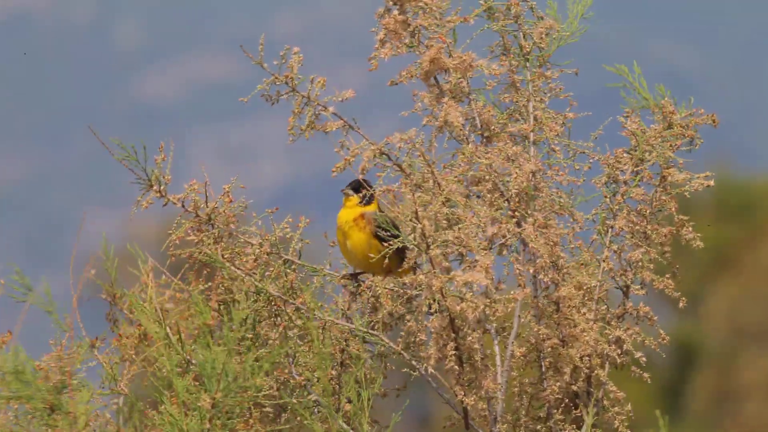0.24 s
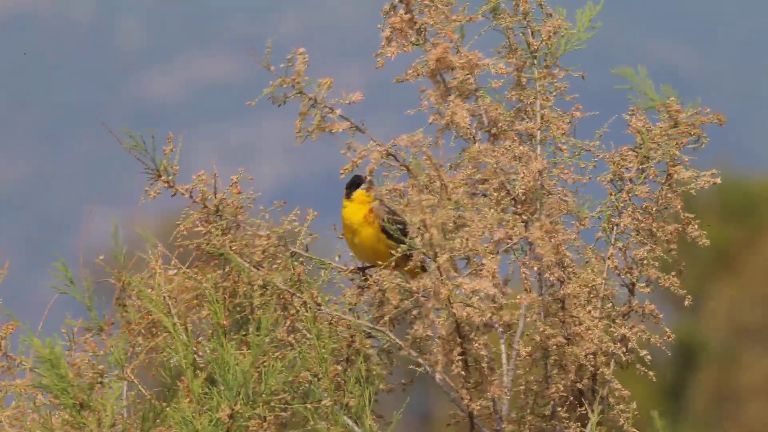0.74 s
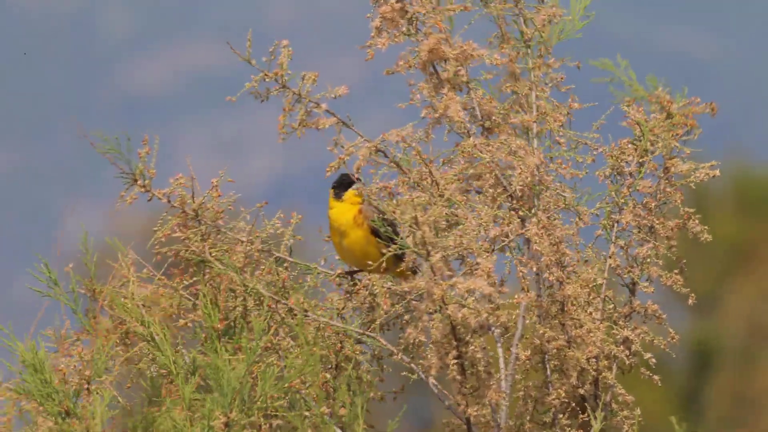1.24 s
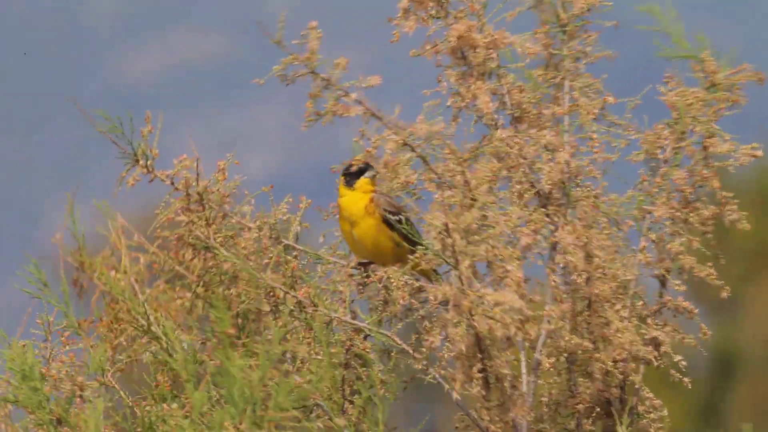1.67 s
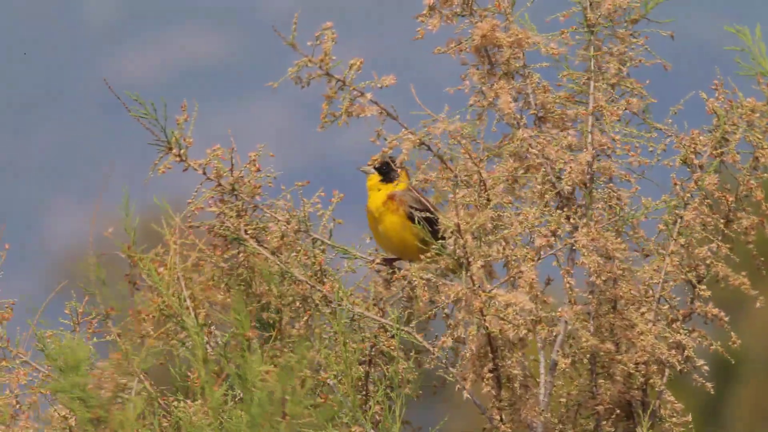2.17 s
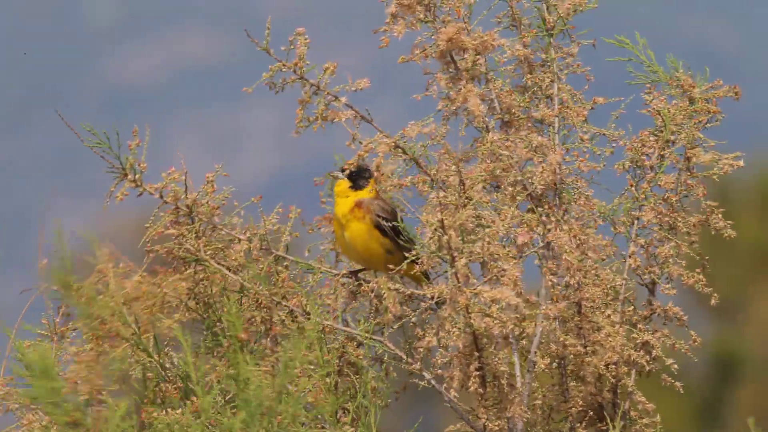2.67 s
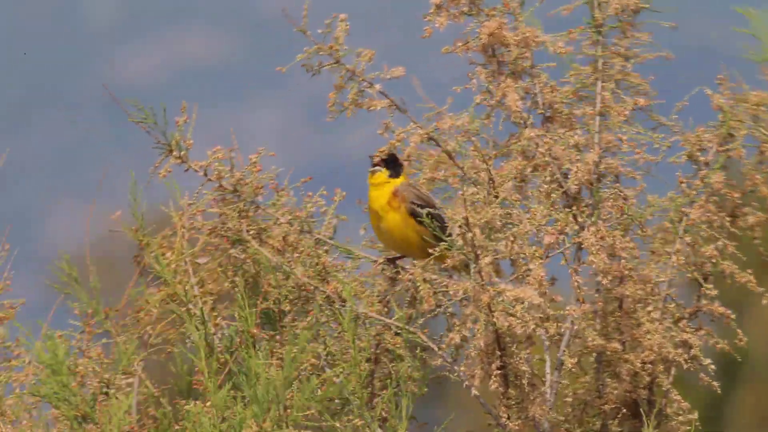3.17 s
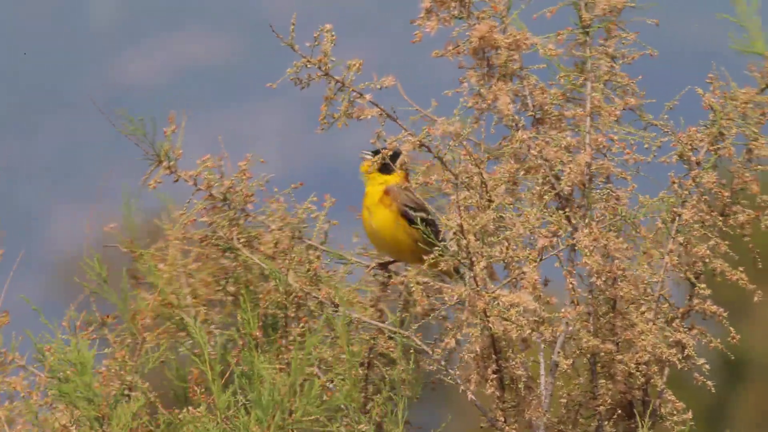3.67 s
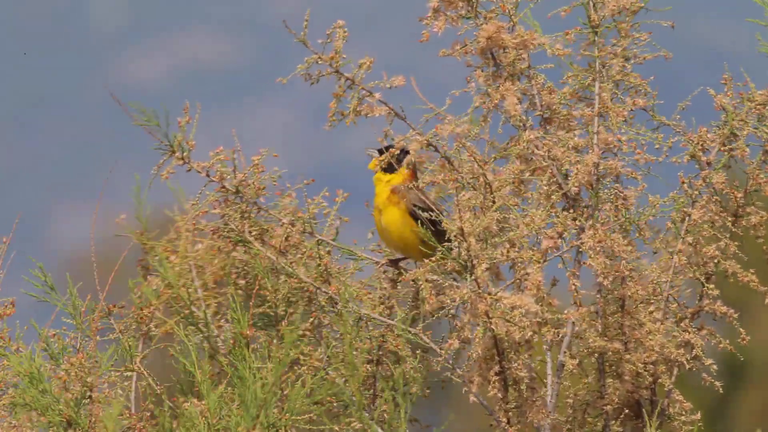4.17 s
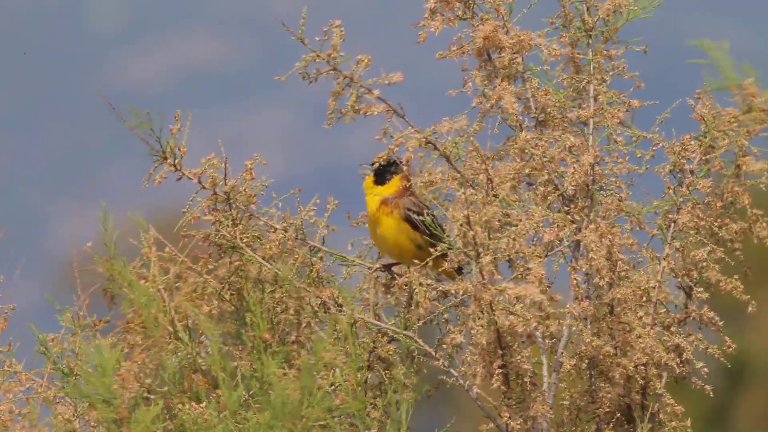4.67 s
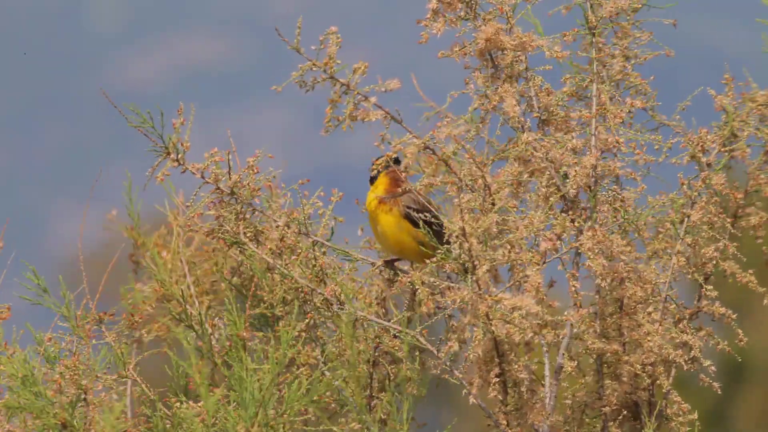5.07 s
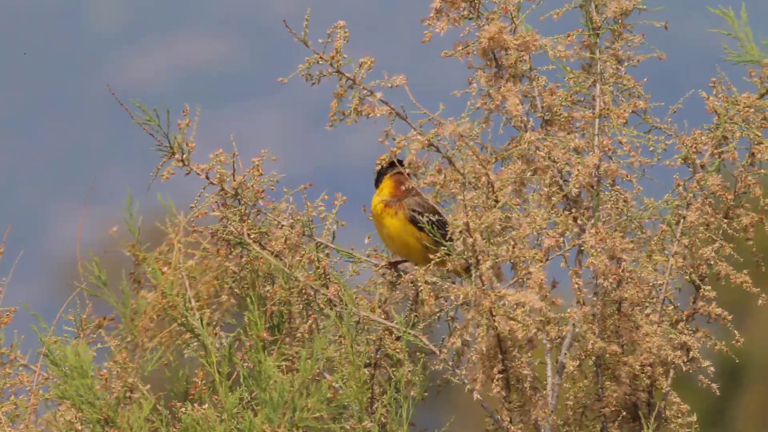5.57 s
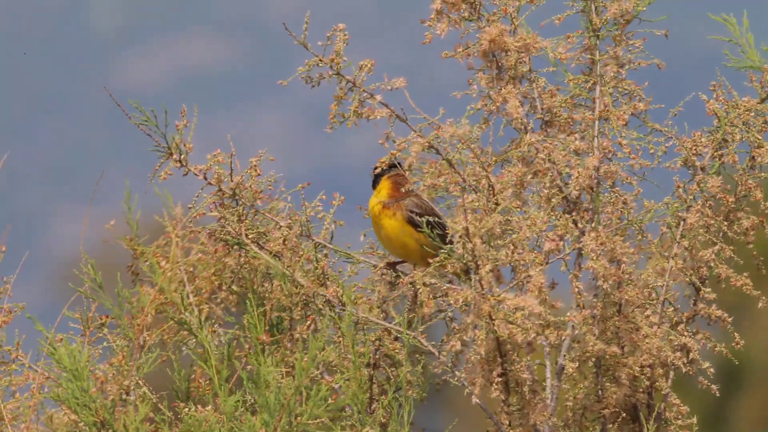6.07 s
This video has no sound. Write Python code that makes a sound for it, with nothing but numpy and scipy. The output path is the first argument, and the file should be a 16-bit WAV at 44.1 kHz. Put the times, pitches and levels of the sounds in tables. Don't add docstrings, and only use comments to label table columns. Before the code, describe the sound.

Outdoors, three brief quavering chirps from a close songbird lead to a rapid, high, varied song, with twig ticks and faint distant birds.

```python
import sys
import numpy as np
from scipy import signal
from scipy.fft import rfft, irfft
from scipy.io import wavfile
from scipy.ndimage import uniform_filter1d

SR = 44100
rng = np.random.default_rng(int(sys.argv[2]) if len(sys.argv) > 2 else 0)


def materialize(psi):
    bounded = np.clip(np.atleast_2d(psi).T, -1, 1)
    quanta = np.round(bounded * 32767).astype(np.int16)
    wavfile.write(sys.argv[1], SR, quanta)


def elevation(decibels):
    levels = np.asarray(decibels, float)
    return 10 ** (levels / 20)


N = 279153


def add(track, s, x):
    i = int(s * SR)
    track[i:i + len(x)] += x[:N - i]


def noise():
    return rng.standard_normal(N)


def band(x, hz, width):
    return signal.lfilter(*signal.iirpeak(hz, hz / width, fs=SR), x)


def steep(x, hz, width):
    return band(band(x, hz, width), hz, width)


def unit(x):
    return x / np.sqrt(np.mean(x ** 2))


def walk(rate):
    k = int(SR / rate)
    steps = np.repeat(rng.standard_normal(N // k + 1), k)
    return unit(uniform_filter1d(uniform_filter1d(steps, k), k)[:N])


def curve(table, ms=False):
    s, *columns = np.transpose(table)
    t = np.arange(0, s[-1], 1000 / SR) if ms else np.arange(N) / SR
    return [np.interp(t, s, c) for c in columns]


def decay(t, t60):
    return np.exp(-np.log(1000) * t / t60)


def swells(table, lull_db):
    t = np.arange(N) / SR
    return elevation(lull_db) + sum(elevation(db) * np.exp(-2 * ((t - s) / length) ** 2) for s, length, db in table)


def scattered(x, db, hz, width, decay_s):
    t = np.arange(SR // 15) / SR
    tail = rng.standard_normal(len(t)) * np.exp(-t / decay_s)
    tail /= np.sqrt(np.sum(tail ** 2))
    return elevation(db) * signal.fftconvolve(steep(x * walk(500), hz, width), tail)[:N]


def songbird():
    pure, quick, breathy, rattle, clicks = np.zeros((5, N))
    warbled_calls(breathy, quick)
    sung_strokes(pure, quick, breathy, rattle, clicks)
    for table in WHISTLES:
        add(pure, table[0][0], whistle(table))
    return echoed(turbulent(pure, quick, breathy, rattle, clicks))


# time in ms, centre pitch in Hz, pitch swing in
# Hz, throb as a share -1 to 1 (above 0 softens the crests), level in dB.
WARBLE = [
    (14, 3900, 540, 0, -22),
    (19, 4100, 800, -.2, -6.5),
    (30, 4180, 680, -.2, -6),
    (45, 4170, 580, .15, -3.5),
    (60, 4200, 320, .45, -2),
    (71, 4220, 190, .52, -3.5),
    (77, 4210, 70, .15, -2.5),
    (83.3, 4210, 5, 0, -5),
    (90, 4210, 5, 0, -24),
]
# start in seconds, level in dB, time stretch as a ratio,
# fade over the call in dB, longer tail in ms.
CALLS_AT = [
    (0.5594, -21, 1.001, -1.5, -1.5),
    (1.929, -19.5, 1.01, -11, 18),
    (2.5135, -17, .97, -3, -3.5),
]
# rate in Hz, time of a crest in ms, share of the throb as a ratio.
VIBRATOS = [
    (198, 28.2, 1.01),
    (198, 29.5, .45),
    (206, 29.3, .8),
]


def warbled_calls(breathy, quick):
    for (s, db, stretch, fade_db, tail_ms), (vibrato_hz, crest_ms, share) in zip(CALLS_AT, VIBRATOS):
        last_ms, *last = WARBLE[-1]
        shape = np.array(WARBLE[:-1] + [(last_ms + tail_ms, *last)])
        hz, swing, throb, shape_db = curve(shape * [stretch, 1, 1, share, 1], ms=True)
        n = len(hz)
        u, unsteady = np.linspace(0, 1, n), walk(250)[:n]
        since_crest = np.arange(n) / SR - crest_ms / 1000
        wobble = np.cos(2 * np.pi * vibrato_hz * since_crest + 0.1 * walk(61)[:n])
        hz = hz + swing * (wobble + 0.05 * unsteady)
        level = elevation(db + shape_db + fade_db * u ** 2 + 0.95 * unsteady)
        add(breathy, s, level * (1 - throb * wobble) * voice(hz))
        add(breathy, s, elevation(db - 12) * push("lead"))
        add(quick, s + .012, elevation(db - 14) * push("turn"))
        for late in (.005, .0172):
            add(breathy, s + late, elevation(db - 10) * push("lead2"))
            add(quick, s + late, elevation(db - 15.5 - 550 * (late - .007)) * push("octave"))


def sung_strokes(pure, quick, breathy, rattle, clicks):
    level_scatter_db, pitch_scatter, time_scatter_s = 1.1, .012, .00025
    tracks = dict(up=quick, down=quick, rattle=rattle, click=clicks, lift=breathy, crook=breathy)
    for name, first, last, ms, db0, db1 in song():
        count = max(int(round((last - first) * 1000 / ms)), 0) + 1
        track = tracks.get(name, pure)
        grow = np.linspace(0, 1, count)
        if name in ("up", "down"):
            grow = np.sin(np.pi / 2 * grow)
        scatter = rng.standard_normal((count, 3))
        for s, g, (loud, sharp, late) in zip(np.linspace(first, last, count), grow, scatter):
            gain = elevation(db0) + g * (elevation(db1) - elevation(db0))
            tune = 1 + (count > 2) * pitch_scatter * sharp
            pulse = elevation(level_scatter_db * loud) * push(name, tune)
            add(track, s + time_scatter_s * late, gain * pulse)


# stroke name, first pulse in seconds
# from the syllable's start, last pulse in seconds, repeat in ms, first level in dB, last level in dB.
BUZZ = [("up", 0, .0707, 11.8, -37, -17.5), ("down", .0036, .0743, 11.8, -37, -16)]
PIPS = [("peck", -.001, .039, 40, -28, -27), ("pip", .001, .041, 40, -29, -29),
        ("hum", .015, .055, 40, -38, -39)]
CHIRR = [("tick", 0, .0065, 6.5, -38, -28), ("drop", .010, .010, 9, -18, -18),
         ("rattle", .023, .054, 6.2, -16, -22.5), ("back", .0205, 0.056, 6.2, -23.5, -28)]
# syllable, start in seconds, time stretch as a ratio, level in dB.
TWICE = [
    (BUZZ, 2.8858, 1.001, .1),
    (BUZZ, 3.1535, 1.062, -1.5),
    (PIPS, 3.735, 1.001, -1.5),
    (PIPS, 3.873, 0.96, 1.7),
    (CHIRR, 3.792, 1.001, .1),
    (CHIRR, 3.9305, 1.001, .1),
]
# stroke name, first pulse in seconds, last pulse in seconds, repeat in ms,
# first level in dB, last level in dB.
TRILLS = [("bead", 3.389, 3.442, 13.3, -17.5, -15.5), ("tick", 3.580, 3.592, 6.1, -20.5, -23),
          ("tick", 3.599, 3.657, 14.5, -19.5, -17), ("hook", 3.6105, 3.6395, 14.5, -26, -27),
          ("hump", 3.6025, 3.661, 14.6, -19.5, -14.5), ("hum", 3.864, 3.904, 40, -37, -37),
          ("click", 4.0435, 4.0998, 6.26, -21, -15.5), ("blip", 4.3385, 4.353, 3.65, -32, -21.5),
          ("dip", 4.375, 4.514, 27.8, -17.5, -19), ("spike", 4.3825, 4.5215, 27.8, -20, -23),
          ("climb", 4.386, 4.497, 27.8, -19, -19.5), ("zip", 4.619, 4.677, 11.6, -36, -19),
          ("zap", 4.622, 4.6805, 11.7, -39, -17), ("tap", 4.700, 4.712, 4.1, -31, -27)]
# stroke name, start in seconds, level in dB.
NOTES = [("swell", 3.368, -24), ("fade", 3.456, -20.5), ("lift", 4.1065, -19.5), ("crook", 4.1115, -16),
         ("low", 4.232, -34), ("low2", 4.292, -35.5), ("low3", 4.283, -43), ("rise", 4.356, -17),
         ("zap", 4.6828, -23), ("ramp", 4.714, -21.5), ("fall", 4.7325, -20.5), ("drip", 4.747, -21)]


def song():
    twice = [(name, s + k * a, s + k * b, k * ms, db + db0, db + db1)
             for syllable, s, k, db in TWICE for name, a, b, ms, db0, db1 in syllable]
    return twice + TRILLS + [(name, s, s, 1, db, db) for name, s, db in NOTES]


FLICKS = { "lead": (13, 2800, 3500, 5300, 0.555), "lead2": (11, 2550, 2880, 3450, .55),
          "octave": (10, 4900, 5650, 6750, .5), "turn": (8, 5100, 4500, 3400, .5),
          "tick": (4.5, 4100, 3460, 3200, .4), "rattle": (4.6, 3950, 3550, 3100, 0.48),
          "click": (3.7, 4950, 4550, 3500, .6), "blip": (3.5, 2700, 2750, 3100, .5),
          "zip": (3.5, 4600, 5150, 5600, 0.53), "zap": (6.3, 5650, 5330, 4800, 0.49),
          "tap": (3.4, 2950, 3120, 3400, .5), "drip": (5.4, 3370, 2980, 2500, .5)}
HELD = { "bead": (11.5, 2980, 2920, 2820, 0.58), "hump": (9.7, 3180, 3380, 3150, 0.53),
        "lift": (7.5, 3600, 4050, 4300, .5), "hum": (16.3, 2380, 2310, 2150, .6),
        "low": (19.4, 2080, 1870, 1800, .25), "dip": (6.5, 3330, 2840, 2440, 0.49),
        "ramp": (17, 3300, 3750, 4030, 0.51), "fall": (13, 4500, 3450, 2970, 0.24)}
STRUCK = { "low2": (15, 2200, 1860, 1800, .2), "low3": (7, 1500, 1650, 1800, .5),
          "fade": (12.3, 2950, 2900, 2800, .5), "rise": (17, 2790, 3050, 3210, 0.41)}
PUSHED = {"drop": (11.9, 4200, 3700, 3330, .4), "crook": (9, 4350, 4150, 4400, 0.4)}
SWELLED = {"swell": (19, 2850, 2900, 2880, .5)}
PLUCKED = {"climb": (14, 2950, 3040, 3140, 0.53), "pip": (14.3, 2500, 2330, 2220, 0.26)}
SNAPS = {"up": (4.77, 2390, 3680, 5950, 0.502), "down": (5.43, 5700, 3800, 2450, 0.449),
         "spike": (4.44, 2220, 2930, 3700, 0.51), "peck": (3, 2980, 2570, 2350, 0.48),
         "back": (3.3, 3120, 3620, 4600, 0.48), "hook": (3.5, 3400, 3450, 3700, 0.49)}
BREATH_OF = [(FLICKS, 0.5, .1, 0.99), (HELD, 0.35, .02, 0.41), (STRUCK, 0.16, .04, .72),
             (PUSHED, .72, .08, 0.56), (SWELLED, 0.87, .02, 2), (PLUCKED, .12, .01, 0.58),
             (SNAPS, 0.53, .09, 1.4)]
SHRILL = {"hump": (-4, 7), "click": (3, 9), "zap": (8, 3), "zip": (8, 3), "ramp": (-8, -7),
          "fall": (-8, -8), "climb": (-8, -8), "rise": (-6, -8), "drop": (-4, -4), "rattle": (-5, 5)}


def push(name, tune=1):
    for kind, top, lean, soft in BREATH_OF:
        if name in kind:
            ms, hz0, hz1, hz2, knee = kind[name]
            top = top + lean * np.sign(hz2 - hz0)
            return stroke(ms, tune * hz0, tune * hz1, tune * hz2, knee, top, soft, SHRILL.get(name, (0, 0)))


def stroke(ms, hz0, hz1, hz2, knee, top, soft, more_db=(0, 0)):
    u = np.linspace(0, 1, int(ms * SR / 1000))
    arch = np.sin(np.pi * np.interp(u, [0, np.clip(top, .05, .95), 1], [0, .5, 1])).clip(0) ** soft
    arch *= np.sin(np.pi / 2 * np.clip(np.minimum(u, 1 - u) * ms / 1.89, 0, 1)) ** 2
    return arch * voice(np.interp(u, [0, np.clip(knee, .05, .95), 1], [hz0, hz1, hz2]), more_db)


def voice(hz, more_db=(0, 0)):
    phase = 2 * np.pi * np.cumsum(hz) / SR
    octaves = np.log2(np.clip(hz, 3400, 4300) / hz)
    bright = elevation(-37 * np.abs(octaves))
    if any(more_db):
        bright = bright * (.6 + .9 * unit(uniform_filter1d(rng.standard_normal(len(hz)), size=36)))
    second, third = elevation(np.add((-36, -40), more_db))
    return np.sin(phase) + bright * (second * np.sin(2 * phase) + third * np.sin(3 * phase))


# time in seconds, pitch in Hz, level in dB.
WHISTLES = [
    [(2.9665, 2950, -36), (2.972, 3400, -21), (2.982, 3520, -14), (2.993, 3489, -19), (3.001, 3480, -17.5),
     (3.007, 3440, -23), (3.011, 3440, -40)],
    [(3.239, 2920, -32), (3.2445, 3400, -19), (3.254, 3510, -15), (3.263, 3500, -19.5), (3.273, 3466, -18),
     (3.278, 3440, -28), (3.285, 3460, -42)],
    [(3.553, 4050, -45), (3.559, 4150, -34), (3.567, 4170, -34), (3.571, 4200, -24.5), (3.578, 4270, -20.5),
     (3.581, 4230, -30)],
    [(4.127, 2050, -52), (4.150, 2010, -36.5), (4.174, 2160, -29.5), (4.184, 2600, -23), (4.193, 2760, -16),
     (4.200, 2764, -20), (4.218, 2673, -22), (4.226, 2450, -25), (4.231, 2280, -40)],
    [(4.7525, 2250, -42), (4.762, 2610, -35), (4.768, 2850, -21.5), (4.772, 3060, -24),
     (4.776, 3250, -21.5), (4.781, 3600, -36)],
    [(4.782, 3700, -36), (4.785, 3040, -22), (4.788, 2900, -24), (4.792, 2800, -22), (4.798, 2600, -30),
     (4.803, 2300, -46)],
    [(4.523, 2750, -30), (4.528, 2700, -18.5), (4.534, 2490, -25.5), (4.546, 2230, -28.5),
     (4.556, 2010, -41)],
]


def whistle(table):
    s, hz, db = np.transpose(table)
    t = np.arange(s[0], s[-1], 1 / SR)

    def soft(column):
        return uniform_filter1d(np.interp(t, s, column), SR // 400, mode="nearest")

    return soft(elevation(db)) * signal.windows.tukey(len(t), .08) * voice(soft(hz))


# centre in Hz, width in Hz, level in dB.
HISS = [(6500, 1600, -28), (8230, 1400, -26), (11000, 1400, -32)]


def turbulent(pure, quick, breathy, rattle, clicks):
    out = pure + rattle + clicks + scattered(rattle + clicks, -4.5, 4100, 2600, .004)
    rasp = steep(quick * unit(steep(noise(), 700, 1100)), 4700, 2200)
    out += breathy + quick + .3 * rasp
    spray = scattered(quick, -5.5, 5600, 2800, .007)
    out += spray + scattered(out, -19, 3600, 4500, .012)
    flow = .7 * uniform_filter1d(np.abs(quick), SR // 70)
    flow += uniform_filter1d(np.abs(.45 * breathy + 1.6 * clicks + .15 * rattle), SR // 300)
    return out + flow * sum(elevation(db) * unit(steep(noise(), hz, width)) for hz, width, db in HISS)


# delay in seconds, level in dB.
ECHOES = [
    (.0031, -18),
    (.0062, -20.5),
    (.0195, -26),
]


def echoed(bird):
    t = np.arange(SR // 2) / SR
    response = np.zeros(len(t))
    for db, t60 in ((-13, 0.084), (-27.5, 0.34)):
        tail = rng.standard_normal(len(t)) * decay(t, t60) * (1 - np.exp(-t / 0.0031))
        response += elevation(db) * unit(tail) / np.sqrt(len(t))
    for s, db in ECHOES:
        response[int(s * SR)] += elevation(db)
    shaken = bird * (0.83 + .45 * walk(160))
    return bird + signal.fftconvolve(shaken, response)[:N]


def neighbours():
    tones = np.zeros(N)
    far_whistler(tones)
    thin_glides(tones)
    tones *= elevation(1.6 * walk(60))
    return tones + harsh_rasp()


# time in ms, pitch in Hz, level in dB.
FAR = [
    (0, 1450, -14),
    (13, 1717, -1),
    (26, 1800, -3),
    (40, 1759, -1),
    (57, 1490, -7),
    (97, 1578, -7),
    (125, 1655, -1.5),
    (171, 1693, .5),
    (190, 1450, -16),
]
# start in seconds, level in dB, change of the opening in dB.
FAR_AT = [
    (1.050, -47.5, 0.5),
    (3.805, -48.5, -0.5),
    (4.800, -49.5, -1),
    (5.745, -47.5, -3),
    (6.312, -50.5, .1),
]


def far_whistler(out):
    hz, shape_db = curve(FAR, ms=True)
    opening = np.arange(len(hz)) < SR // 20
    for s, db, opening_db in FAR_AT:
        add(out, s, elevation(db + shape_db + opening_db * opening) * voice(hz))


# start in seconds, length in ms, start
# pitch in Hz, end pitch in Hz, level in dB.
GLIDES = [(.309, 30, 4400, 4800, -41), (.310, 21, 6400, 5600, -37.5), (.098, 20, 4950, 5050, -52),
          (.310, 22, 8900, 9500, -50), (.440, 30, 4150, 4350, -53.5), (1.340, 27, 4150, 5240, -34),
          (1.341, 24, 5300, 6460, -36.5), (1.341, 18, 8500, 9700, -40.5), (1.344, 15, 10000, 11100, -55),
          (1.780, 42, 780, 890, -54), (1.400, 90, 3250, 3350, -56), (2.100, 65, 4300, 4500, -60),
          (2.868, 16, 5800, 6000, -50), (3.612, 14, 5600, 5650, -48), (4.130, 22, 5650, 6050, -50),
          (4.220, 55, 3600, 4300, -55), (4.167, 17, 6300, 7050, -53), (4.186, 36, 5500, 5450, -52),
          (4.272, 60, 3350, 3250, -50), (4.500, 55, 4150, 4100, -55), (4.930, 80, 3700, 4200, -50.5),
          (5.003, 62, 4200, 4950, -50), (5.060, 28, 4950, 5000, -49), (5.222, 22, 4450, 4300, -46),
          (5.255, 50, 4300, 5600, -57)]


def thin_glides(out):
    for s, ms, hz0, hz1, db in GLIDES:
        tone = stroke(ms, hz0, (hz0 + hz1) / 2, hz1, .45, .5, 0.87)
        add(out, s, elevation(db + 2.25 * walk(263)[:len(tone)]) * tone)


# start in seconds, length in ms, puff rate in Hz, level in dB.
RASP = (5.343, 85, 124, -36)
# centre in Hz, width in Hz, level in dB.
RASP_THROAT = [(1800, 400, 6), (2900, 400, 6), (3950, 500, 1), (7000, 3500, -20)]


def harsh_rasp():
    out = np.zeros(N)
    s, ms, hz, db = RASP
    n = int(ms * SR / 1000)
    puff_phase = np.arange(n) * hz / SR % 1
    puffs = rng.standard_normal(n) * (0.97 + np.exp(-puff_phase / 0.32))
    ring = sum(elevation(d) * steep(puffs, f, 1.4 * w) for f, w, d in RASP_THROAT)
    add(out, s, elevation(db) * unit(ring) * np.sin(np.pi * (np.arange(n) / n) ** 0.74) ** 0.62)
    return out


# start in seconds, length in ms, pitch in Hz, level in dB.
CHURRS = [(3.500, 79, 3800, -50.5), (3.675, 65, 3300, -49), (4.015, 25, 4000, -50), (4.120, 55, 3600, -48),
          (3.860, 70, 3600, -51), (4.270, 65, 3300, -49), (4.400, 120, 4300, -54), (4.555, 60, 3700, -48.5),
          (4.800, 53, 3520, -50.5), (4.920, 53, 3500, -51), (5.015, 53, 3300, -51),
          (5.140, 62, 3600, -49.5), (5.225, 46, 3500, -51.5), (5.435, 47, 3480, -51.5),
          (5.545, 72, 3510, -50), (5.665, 49, 3710, -50.5), (5.725, 51, 3790, -56.5),
          (5.810, 69, 3700, -50.5), (5.925, 80, 3900, -53), (6.015, 115, 3690, -51.5),
          (6.190, 58, 3705, -50), (6.305, 50, 3700, -51)]


def rival():
    churr_hz, churr_swing = 90, 0.1694
    out, t = np.zeros(N), np.arange(SR // 20) / SR
    wander, patchy = walk(450), elevation(1.6 * walk(70))
    for s, ms, hz, db in CHURRS:
        u = np.linspace(0, 1, int(ms * SR / 1000))
        drift = np.roll(wander, -int(s * SR))[:len(u)]
        wobble = 0.593 * np.sin(2 * np.pi * churr_hz * u * ms / 1000) + .62 * drift
        trill = voice(1.03 * hz * np.exp(churr_swing * wobble))
        blur = rng.standard_normal(len(t)) * np.exp(-t / .016)
        arch = np.sin(np.pi * u).clip(0) ** 0.52
        add(out, s, elevation(db - 3.5) * unit(signal.fftconvolve(trill * arch, blur)))
    return out * patchy


# start in seconds, peak level in dB, colour in Hz, treble level in dB,
# decay by 60 dB in seconds.
TICKS = [(0.1516, -23, 1700, -10, .014), (.1536, -25, 1400, -9, .018), (.158, -40, 1200, -20, .06),
         (.185, -38.5, 1500, -7, .04), (0.2346, -34, 4440, -9, .025), (0.349, -36.5, 3000, -12, .04),
         (1.1094, -47, 9000, -6, .04), (2.0615, -39, 5000, 1, .04), (2.068, -38, 2500, -6, .04),
         (2.3369, -29, 2600, -2, 0.039), (2.435, -42, 3000, -11, .04), (2.587, -30, 3200, -4, 0.042),
         (4.035, -39, 525, -18, 0.029), (4.043, -34, 2300, -1, 0.056), (5.0933, -40, 1830, -9, .03),
         (5.1874, -41, 1000, -9, .03), (5.5428, -36.5, 2390, -16, .025), (5.7886, -25.5, 2900, -23, 0.04)]
# mode in Hz, level in dB, decay by 60 dB in seconds.
KNOCK = [(743, -7, 0.016), (1850, 0.5, .018), (3400, -8, 0.014), (2320, -12, 0.023), (737, -21.5, 0.14),
         (572, -7, 0.017), (1280, -9, 0.013), (5200, -16.5, 0.0085), (2100, -11.5, 0.028),
         (2800, -7.5, 0.012), (258, -20.5, 0.041)]


def twigs():
    out, t = np.zeros(N), np.arange(SR // 5) / SR
    for s, db, hz, treble_db, t60 in TICKS:
        burst = rng.standard_normal(len(t)) * decay(t, t60) * (1 - np.exp(-t / 0.00054))
        colour = steep(steep(burst, hz, 1.6 * hz), hz, 1.6 * hz)
        treble = steep(burst, 6900, 6000) + .33 * steep(burst, 12500, 6000)
        body = steep(burst, 580, 730)
        tick = unit(colour) + elevation(treble_db) * unit(treble) + elevation(-17.5) * unit(body)
        add(out, s, elevation(db) * tick / np.abs(tick).max())
    ring = sum(elevation(db) * np.sin(2 * np.pi * hz * t) * decay(t, t60) for hz, db, t60 in KNOCK)
    ring *= 1 - np.exp(-t / .0007)
    add(out, 1.7195, elevation(-14.5) * ring / np.abs(ring).max())
    return out


def outdoors():
    return still_air() + wind() + hand_rub() + insect_chirps() + far_hum()


# frequency in Hz, density in dB per Hz.
AIR = [(20, -14), (64, -0.3), (120, -6.5), (180, 3), (330, -8.5), (1230, -13), (3500, -9.5), (15500, -28)]


def still_air():
    hz = np.fft.rfftfreq(N, 1 / SR) + 1
    corner_hz, corner_db = np.transpose(AIR)
    colour = elevation(np.interp(np.log(hz), np.log(corner_hz), corner_db))
    return elevation(-54.5 + 0.84 * walk(6)) * unit(irfft(rfft(noise()) * colour, N))


# time in seconds, peak level in dB, pitch in Hz.
GUSTS = [(0.199, -50, 86.1), (0.619, -49, 72.7), (0.819, -50, 72.7), (0.945, -57, 167), (1.06, -50, 161),
         (1.251, -33.5, 108), (1.339, -44, 156), (1.300, -42, 70), (1.900, -43, 55), (3.470, -47, 55),
         (4.000, -45, 50), (4.290, -47, 50), (1.467, -51, 72.7), (1.841, -36, 83.4), (2.023, -39.5, 88.8),
         (2.119, -38, 72.7), (2.153, -36.5, 121), (2.179, -34, 102), (2.445, -32.5, 151), (2.452, -33, 110),
         (2.723, -37, 91.5), (2.767, -38, 113), (2.858, -26.5, 163), (2.969, -42, 124), (3.355, -44, 83.4),
         (3.59, -44, 72.7), (3.795, -43, 118), (3.829, -38, 72.7), (4.029, -45, 72.7), (4.106, -31, 94.2),
         (5.809, -37.5, 99.6), (6.001, -48, 72.7)]


def wind():
    thump_s, skirt_s, skirt_db, lull_db = 0.00619, 0.044, -18, -65.5
    out, t = np.zeros(N), np.arange(-2 * thump_s, 2 * thump_s, 1 / SR)
    for (s, db, hz), turn in zip(GUSTS, rng.random(len(GUSTS))):
        add(out, s, elevation(db - 0.5) * np.exp(-2 * (t / thump_s) ** 2) * np.cos(2 * np.pi * (hz * t + turn)))
    skirts = swells([(s + thump_s, skirt_s, db + skirt_db) for s, db, _ in GUSTS], lull_db)
    return out + skirts * elevation(2.7 * walk(25)) * unit(steep(noise(), 70, 90))


# time of the peak in seconds, length in seconds, level in dB.
RUBS = [
    (.02, 0.065, -53.5),
    (.124, 0.043, -55),
    (.21, 0.11, -58),
    (.614, .05, -62),
    (.854, 0.073, -57.5),
    (1.004, 0.056, -53.5),
]


def hand_rub():
    return elevation(-2) * swells(RUBS, -90) * unit(steep(noise(), 360, 520))


# time in seconds, level in dB.
INSECT = [(0, -57), (.35, -51.5), (.62, -52), (.9, -53.5), (1.2, -57), (1.41, -55.5), (1.57, -60),
          (2.1, -61), (2.7, -60), (2.96, -57), (3.5, -77), (3.98, -63), (4.42, -65), (5.04, -72),
          (6.33, -69)]


def insect_chirps():
    insect_db, = curve(INSECT)
    puff_phase = 2 * np.pi * (np.arange(N) / SR - .14) / .222
    puff_db = 5 * np.tanh(2 * np.cos(puff_phase) + 0.93)
    crackle = noise() * elevation(1.6 * rng.exponential(size=N))
    return elevation(insect_db - 8.5 + puff_db + 1.7 * walk(8.1)) * unit(steep(crackle, 7600, 5200))


# time of the peak in seconds, length in seconds, level in dB.
HUM_SWELLS = [
    (.15, 0.17, -57),
    (.7, 0.23, -54.5),
    (1.06, 0.14, -56),
    (2.2, 0.4, -55.5),
    (2.5, .2, -56),
    (2.8, .3, -53),
    (3.55, 0.2, -56),
]
# centre in Hz, width in Hz, level in dB.
HUM_BANDS = [(830, 260, -4.5), (1700, 600, 0), (3300, 1500, -2)]


def far_hum():
    gain = swells(HUM_SWELLS, -68.5) * elevation(-5.5 + 2.2 * walk(8.08))
    bands = [elevation(db + 1.9 * walk(12)) * steep(noise(), hz, width) / np.sqrt(width)
             for hz, width, db in HUM_BANDS]
    return gain * unit(sum(bands))


def scene():
    return (songbird() + neighbours() + rival() + twigs() + outdoors())[None]


def roll_off(x):
    return signal.sosfilt(signal.butter(12, 16410, fs=SR, output="sos"), x)


def record(dry):
    low_pass = signal.ellip(10, .2, 60, 15780, fs=SR, output="sos")
    mix = signal.sosfilt(low_pass, dry)
    return roll_off(mix)


dry = scene()
out = record(dry)
materialize(out)
```